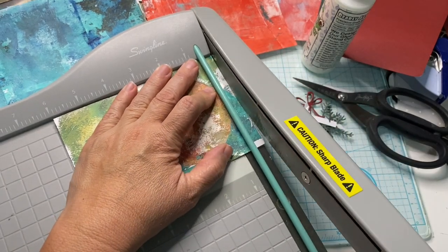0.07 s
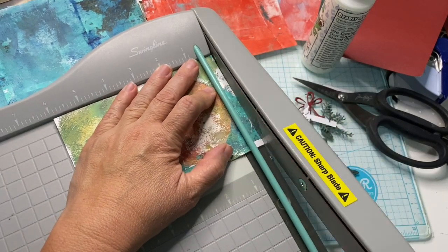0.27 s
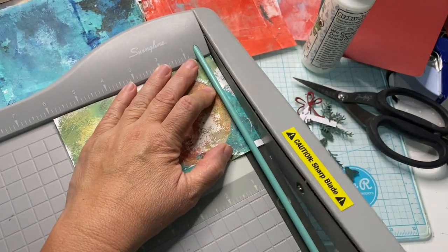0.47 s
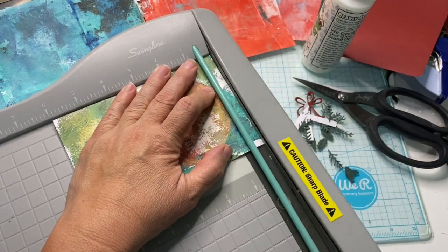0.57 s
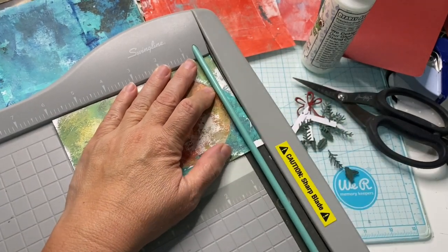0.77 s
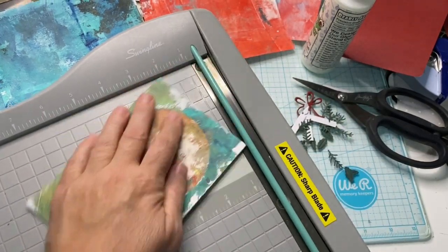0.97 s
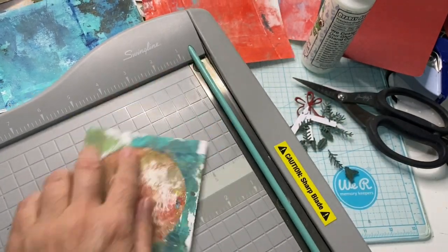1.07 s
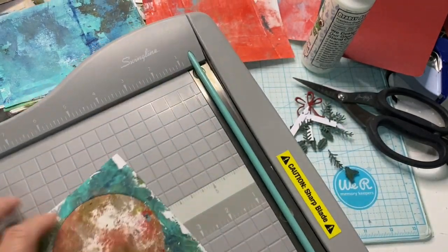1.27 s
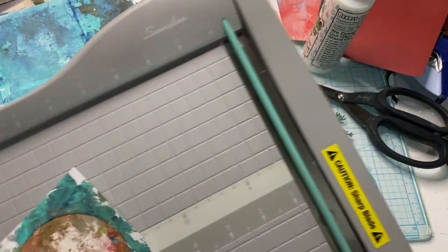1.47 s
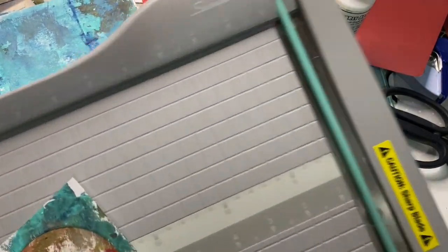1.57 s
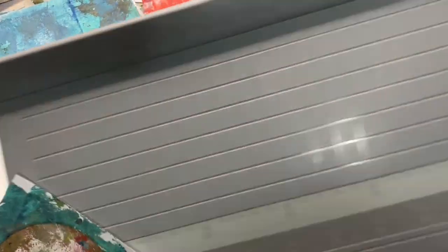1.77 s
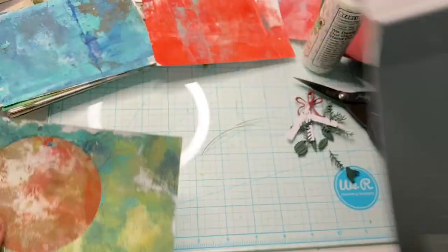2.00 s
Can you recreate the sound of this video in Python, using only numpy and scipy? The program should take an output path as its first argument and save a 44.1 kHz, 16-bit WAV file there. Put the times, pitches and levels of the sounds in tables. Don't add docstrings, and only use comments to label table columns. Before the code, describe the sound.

A guillotine paper trimmer shears card in two raspy strokes, then clunks shut and knocks the table.

```python
import sys
import numpy as np
from scipy import signal
from scipy.fft import rfft, irfft, next_fast_len
from scipy.io import wavfile
from scipy.ndimage import uniform_filter1d, map_coordinates

SR = 44100
rng = np.random.default_rng(int(sys.argv[2]) if len(sys.argv) > 2 else 0)


def makeup_ratio(level_db):
    decades = np.asarray(level_db, float) / 20
    return 10 ** decades


def pcm_store(signal):
    levels = np.round(np.clip(np.atleast_2d(signal), -1, 1) * 32767)
    wavfile.write(sys.argv[1], SR, levels.astype(np.int16).T)


N = 89875
TAP_Q = 1.66


def unit(x):
    return x / np.sqrt(np.mean(x ** 2) + 1e-20)


def along(points, hz):
    f, value = np.transpose(points)
    return np.interp(np.log(hz + 1), np.log(f + 1), value)


def curves(rows):
    s, level, *rest = np.transpose(rows)
    t = np.arange(N) / SR
    return [np.interp(t, s, level, -120, -120)] + [np.interp(t, s, column) for column in rest]


def wobble(rate):
    knots = rng.standard_normal(int(N * rate / SR) + 4)
    return map_coordinates(knots, [np.arange(N) * rate / SR])


def filtered(x, response):
    m = next_fast_len(x.shape[-1] + SR // 2)
    spectrum = rfft(x, m) * response(np.fft.rfftfreq(m, 1 / SR))
    return irfft(spectrum, m)[..., :x.shape[-1]]


def resonant(x, peaks, widen):
    def response(f):
        total = 0
        for k, (centre, width, db) in enumerate(peaks):
            damping = 1j * f * width * widen
            total = total + (-1) ** k * makeup_ratio(db) * damping / (centre * centre - f * f + damping)
        return total
    return unit(filtered(x, response))


def rush(spectrum, patchy_db):
    z = signal.stft(rng.standard_normal(N), nperseg=512)[2]
    field = uniform_filter1d(uniform_filter1d(rng.standard_normal(z.shape), 5, 0), 6, 1)
    x = signal.istft(z * makeup_ratio(patchy_db * unit(field)), nperseg=512)[1][:N]
    return unit(filtered(x, lambda hz: makeup_ratio(along(spectrum, hz))))


def fibres():
    fibres_per_s, spread_db, smooth_share = 2700, -0.5, 0.45
    hit = rng.random(N) < fibres_per_s / SR * makeup_ratio(4.5 * wobble(90))
    size = makeup_ratio(spread_db * np.minimum(rng.exponential(size=N), 3))
    snaps = unit(hit * rng.uniform(-1.03, 1, N) * size)
    return np.sqrt(1 - smooth_share) * snaps + np.sqrt(smooth_share) * rng.standard_normal(N)


def shear():
    # start_s, level_db, low_body_db over the level, note_hz
    strokes = [
        [(.138, -72, 4, 1400), (.153, -59, 13, 1398), (.183, -43.5, 2.5, 1330), (.209, -31.5, -2, 1302),
         (.235, -33, 0.5, 1380), (.283, -32, 3.5, 1590), (.293, -65, 1, 1550), (.32, -83, 8, 1550)],
        [(.4, -77, 22, 890), (.415, -54, 9, 885), (.459, -29, -5, 910), (.48, -40.5, 11, 955),
         (.552, -33, -10, 1250), (.559, -27, -25, 1520), (.593, -35.5, -2.5, 1300), (.61, -27.5, -11.5, 1688),
         (.651, -31, -9, 1460)],
    ]
    # centre_hz, width_hz, level_db
    base_peaks = [(318, 225, 5), (622, 10.7, 10), (794, 22, 6.5)]
    heel_peaks = [(1330, 30, 4), (1788, 35, 2.5), (2257, 65, 2.5), (3010, 105, -0.5)]
    tip_peaks = [(1410, 360, -2), (1690, 49, 0.5), (2190, 130, -15.5), (2660, 65, -5.5)]
    edge_peaks = [(3700, 420, -2), (4530, 64, -12.5), (5990, 110, 1.5), (5760, 42, 8.5)]
    # multiple, level_db
    note_partials = [(1, 0), (1.75, -7), (4.2, -26)]
    tip_from_s, tip_over_s, blade_widen = 0.552, 0.012, 2.06
    edge_db, edge_tip_db, note_db, note_width_hz = -4.5, -4, -13.5, 170

    tear = fibres()
    turn = np.pi / 2 * np.clip((np.arange(N) / SR - tip_from_s) / tip_over_s, 0, 1)
    heel = np.cos(turn) * resonant(tear, heel_peaks, blade_widen)
    tip = np.sin(turn) * resonant(tear, tip_peaks, blade_widen)
    blade = (heel + tip) * makeup_ratio(1.5 * wobble(70))
    base = resonant(tear, base_peaks, 1.41) * makeup_ratio(0.79 * wobble(60))
    hiss = unit(np.diff(tear, prepend=0))
    edge_gain = makeup_ratio(edge_db + edge_tip_db * np.sin(turn) + 1.5 * wobble(30))
    edge = (resonant(tear, edge_peaks, 6) + 0.4 * hiss) * edge_gain

    takes = np.array([np.roll(tear, 999 * k) for k in range(2 * len(note_partials))])
    flutter = unit(filtered(takes, lambda f: 1 / (1 + 1j * f / note_width_hz) ** 2)).reshape(-1, 2, N)
    out = 0
    for db, low_db, hz in map(curves, strokes):
        phase = 2 * np.pi * np.cumsum(hz) / SR
        note = 0
        for (multiple, level), (a, b) in zip(note_partials, flutter):
            note = note + makeup_ratio(level) * (a * np.cos(multiple * phase) + b * np.sin(multiple * phase))
        out = out + makeup_ratio(db) * (makeup_ratio(-1.5) * blade + makeup_ratio(note_db) * note + makeup_ratio(low_db) * base + edge)
    return out


def streaks():
    # start_s, length_s, level_db, from_hz, to_hz
    glides = [(0.16, .11, -42.5, 1420, 1232), (0.18, .07, -39, 2240, 2321), (.23, 0.052, -37.5, 2300, 2655),
              (.17, 0.079, -41, 590, 961), (0.17, .05, -44.5, 1760, 1780), (0.26, .07, -38, 235, 145),
              (.19, 0.069, -43.5, 6100, 7300), (1.19, 0.16, -48, 79.2, 84), (.585, 0.073, -42, 5200, 6200),
              (.44, .06, -35, 600, 690), (0.47, 0.075, -39, 930, 1190), (.55, 0.043, -35, 1380, 1490),
              (.553, .04, -35.5, 1950, 1726), (.553, 0.084, -37, 2640, 2560),
              (0.55, .05, -44.5, 3400, 3560), (0.59, .055, -33.5, 1290, 1492),
              (0.59, .055, -33.5, 1800, 1620), (0.57, .075, -37, 700, 828), (.5, .08, -45.5, 330, 289),
              (1.563, 0.12, -53.5, 1520, 1662), (1.608, 0.063, -53, 2260, 2260),
              (1.566, 0.078, -54.5, 2720, 2700), (1.598, .07, -54.5, 3550, 3550),
              (1.744, .09, -58, 1850, 1792), (1.885, 0.15, -68.5, 3790, 3810),
              (1.973, 0.084, -72.5, 1900, 1990)]
    sharpness, fade_s = 20, 0.013
    out = np.zeros(N + SR)
    for s, length, db, start_hz, end_hz in glides:
        t = np.arange(round(length * SR)) / SR
        phase = 2 * np.pi * (start_hz * t + (end_hz - start_hz) * t * t / (2 * length))
        noise = rng.standard_normal((2, SR // 4))
        slow = filtered(noise, lambda f: 1 / (1 + 1j * f * sharpness / start_hz) ** 2)
        a, b = unit(slow[:, -len(t):])
        fade = np.clip(np.minimum(t, length - t) / fade_s, 0, 1)
        out[round(s * SR):][:len(t)] += makeup_ratio(db) * fade * ((a + 0.55) * np.cos(phase) + b * np.sin(phase))
    return out[:N]


def blow(contacts, modes, colour, ring_db, noise_db, low_t60, high_t60, damp):
    out, t = np.zeros(N + SR), np.arange(SR // 2) / SR
    onset = 1 - np.exp(-t / 0.00066)
    for s, db, bright in contacts:
        ring = 0
        for hz, level, t60 in modes:
            tilt_db = 33 * max(bright - 0.5, 0) * np.log10(hz / 2000)
            decay_db = -60 * t / (t60 * min(1, damp + 60 / hz))
            ring = ring + makeup_ratio(level + rng.normal(0, 1.8) + tilt_db + decay_db) * np.sin(2 * np.pi * hz * t)
        white = rng.standard_normal((2, len(t)))
        dull = unit(filtered(white[0], lambda f: makeup_ratio(along(colour, f)) / (1 + (f / 1500) ** 2)))
        crisp = unit(filtered(white[1], lambda f: makeup_ratio(along(colour, f)) / (1 + (1500 / (f + 1)) ** 2)))
        burst = dull * makeup_ratio(-60 * t / low_t60) * (1 - bright) + crisp * makeup_ratio(-60 * t / high_t60) * bright
        out[round(s * SR):][:len(t)] += makeup_ratio(db) * (makeup_ratio(ring_db) * ring + makeup_ratio(noise_db) * burst) * onset
    return out[:N]


def arm_on_stop():
    # start_s, peak_db, brightness (0-1)
    landings = [
        (.6525, -11, 0.5),
        (.6545, -4, 0.23),
        (.659, -20.5, 0.57),
        (.6615, -21, 0.2),
        (.683, -28, 0.78),
    ]
    # pitch_hz, level_db, t60_s
    arm_modes = [(287, -5, 0.28), (330.6, -7, 0.19), (432, -3.5, .1), (500, -14, 0.03), (591, 0.5, .12),
                 (802, -14, 0.098), (972, -3, 0.07), (1176, -6, 0.065), (1470, -3, 0.037),
                 (1726, -12.5, 0.27), (2166, -0.5, 0.08), (2550, -6, 0.11), (3245, -0.5, 0.067),
                 (3540, -7.5, .04)]
    # pitch_hz, level_db per Hz
    clatter = [(100, -7), (500, 1), (2500, -9), (5000, -20.5), (16000, -38.5)]
    return blow(landings, arm_modes, clatter, ring_db=-10, noise_db=-1.5, low_t60=0.053, high_t60=0.045,
                damp=0.3)


def base_on_table():
    # start_s, peak_db, brightness (0-1)
    knocks = [
        (1.398, -31.5, 0.86),
        (1.4035, -22, 0.78),
        (1.4062, -11.5, 0.77),
        (1.4075, -7, 0.81),
        (1.4095, -9.5, 0.86),
        (1.4112, -12, 0.11),
        (1.417, -19.5, 0.4),
        (1.428, -25.5, 0.11),
    ]
    # pitch_hz, level_db, t60_s
    board_modes = [(245, -6, 0.22), (306, -18, 0.44), (326, -5.5, 0.28), (368.3, -2.5, 0.3),
                   (450, -7, 0.31), (525, -18, .36), (565.6, -3.5, 0.2), (761, -4.5, 0.088),
                   (1300, 3, 0.11), (1954, -3, 0.087), (2300, -1.5, 0.07), (3700, -8, 0.051),
                   (5330, -6, 0.04)]
    # pitch_hz, level_db per Hz
    bang = [(100, -3), (500, 4.5), (2000, -11.5), (5300, -21), (16000, -28.5)]
    return blow(knocks, board_modes, bang, ring_db=-8, noise_db=2, low_t60=0.09, high_t60=0.028, damp=0.51)


def taps():
    # start_s, peak_db, centre_hz, t60_s
    touches = [(0, -37, 490, .15), (.002, -45, 161, .35), (.21, -28, 3000, .01), (.277, -21, 326, 0.066),
               (0.331, -44.5, 151, 0.23), (.181, -27, 2300, 0.012), (.421, -37, 3000, .015),
               (0.554, -31, 2420, .02), (1.061, -37, 5430, .05), (1.06, -32, 530, 0.13),
               (1.062, -34, 990, 0.053), (1.112, -37.5, 1600, 0.07), (1.687, -37, 6240, .03),
               (1.287, -50, 6440, 0.052), (1.298, -39.5, 80.5, 0.5), (0.66, -27.5, 61, 0.19),
               (.664, -26.5, 135.1, 0.38), (1.413, -15.5, 84.3, 0.34), (1.421, -24.5, 152, 0.19),
               (1.852, -29.5, 6400, 0.028), (1.853, -48.5, 305, 0.076)]
    out, t = np.zeros(N + SR), np.arange(SR // 2) / SR
    for s, db, hz, t60 in touches:
        burst = resonant(rng.standard_normal(len(t)), [(hz, hz / TAP_Q, 0)], 0.91)
        note = np.sin(2 * np.pi * hz * t) * (hz < 400)
        touch = note + (0.033 + 0.5 * (hz > 200)) * burst
        out[round(s * SR):][:len(t)] += makeup_ratio(db - 60 * t / t60) * touch * (1 - np.exp(-t * hz / 0.3))
    return out[:N]


def card_slide():
    # start_s, level_db
    rub_levels = [(0, -75), (.1, -64), (.13, -76), (.39, -71.5), (.7, -42), (.74, -66), (.8, -63),
                  (.86, -51.5), (1.04, -47.5), (1.18, -52), (1.24, -59), (1.38, -56), (1.53, -54.5),
                  (1.58, -45), (1.66, -45), (1.72, -46.5), (1.81, -49.5), (1.92, -55), (2.04, -75.5)]
    # pitch_hz, level_db per Hz
    rub_colour = [(150, -34), (350, 0), (1600, 1), (2800, -1.5), (4600, 1.5), (6500, -5), (11000, 1),
                  (16000, -8.5)]
    rub_db, = curves(rub_levels)
    return makeup_ratio(rub_db + 2.1 * wobble(59.72)) * rush(rub_colour, patchy_db=-0.5)


def scrapes():
    # start_s, length_s, level_db, centre_hz
    rubs = [
        (1.21, 0.14, -49.5, 327),
        (1.575, 0.093, -49.5, 1730),
        (1.757, .2, -55, 304),
        (0.692, 0.06, -45, 246),
        (1.6, 0.17, -52.5, 6500),
        (1.72, 0.087, -54, 1680),
    ]
    t = np.arange(N) / SR
    out = 0
    for s, length, db, hz in rubs:
        fade = np.clip(np.minimum(t - s, s + length - t) / 0.035, 0, 1)
        grain = resonant(rng.standard_normal(N), [(hz, hz / TAP_Q, 0)], 0.87)
        out = out + makeup_ratio(db + 2.7 * wobble(80)) * fade * grain
    return out


def table_rumble():
    # start_s, level_db
    shake_levels = [(0, -49), (.23, -76.5), (.37, -54), (.4, -53), (.44, -50), (.49, -37.5), (.56, -66),
                    (.72, -48), (.92, -66), (1.14, -56), (1.28, -44), (1.38, -51), (1.8, -60.5),
                    (1.86, -52), (2.04, -64)]
    # pitch_hz, level_db per Hz
    table_colour = [(25, -39.5), (76, -1), (168, -12), (400, -14), (1000, -49.5)]
    shake_db, = curves(shake_levels)
    return makeup_ratio(shake_db + 3 * wobble(21)) * rush(table_colour, patchy_db=1.5)


def ports(x):
    # pitch_hz, left_lead_rad
    lead = [(150, 0), (860, -1.1), (1640, .3), (2500, 1.2), (3200, 2), (3800, 1.3), (4700, 2.8),
            (5300, 6.3), (6000, 6.8), (11300, 9.3), (15700, 9.5)]
    # pitch_hz, left_over_right_db
    lean = [(200, .3), (400, 0), (1300, -2), (4400, -1.5), (8100, 1), (15000, 0)]
    # pitch_hz, share that differs between ports (0-1)
    unlike = [(150, 0), (600, .3), (3000, .3), (9000, .3), (11000, 0)]
    scatter = rng.standard_normal(300) * makeup_ratio(-60 * np.arange(300) / SR / 0.022)
    scattered = np.convolve(x, scatter / np.linalg.norm(scatter))[:N]
    other = filtered(scattered, lambda f: np.clip(along(unlike, f), 0, 1))
    half = np.array([[0.5], [-0.5]])
    return filtered(x + 2 * half * other,
                    lambda f: makeup_ratio(half * along(lean, f)) * np.exp(1j * half * along(lead, f)))


def room(x):
    # pitch_hz, t60_s
    room_decay = [(150, 0.15), (1000, 0.16), (4000, 0.16), (12000, 0.15)]
    hz, t, z = signal.stft(rng.standard_normal((2, SR // 2)), SR, nperseg=256)
    tail = signal.istft(z * makeup_ratio(-60 * t / along(room_decay, hz)[:, None]), SR, nperseg=256)[1]
    tail = filtered(tail, lambda f: 1 / (1 + (350 / (f + 1)) ** 2) / (1 + (f / 8000) ** 12))
    late = np.pad(x, (250, 0))[None]
    return signal.fftconvolve(late, tail / np.linalg.norm(tail[0]), axes=1)[:, :N]


def scene():
    crack_db, room_db = -8, -15.5
    hits = arm_on_stop() + base_on_table() + taps()
    near = shear() + streaks() + hits + card_slide() + scrapes() + table_rumble()
    crack = filtered(hits, lambda f: f > 11000)
    return ports(near) + makeup_ratio(crack_db) * crack + makeup_ratio(room_db) * room(near)


def roll_off(x):
    return signal.sosfilt(signal.butter(12, 17000, fs=SR, output="sos"), x)


def record(dry):
    # pitch_hz, level_db
    mic_response = [(25, -15), (60, 1.5), (11000, 1.5), (15900, -7), (16300, -42.5)]
    ceiling = 0.98
    limited = dry / (1 + np.abs(dry / ceiling) ** 4) ** (1 / 4)
    mix = filtered(limited, lambda f: makeup_ratio(along(mic_response, f)))
    return roll_off(mix)


dry = scene()
out = record(dry)
pcm_store(out)
```